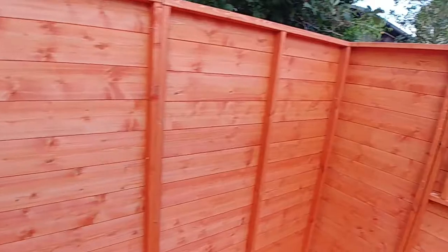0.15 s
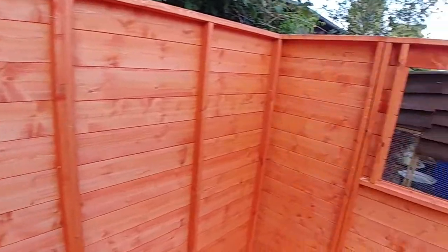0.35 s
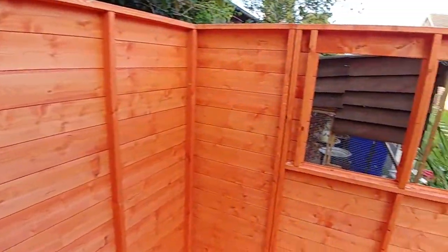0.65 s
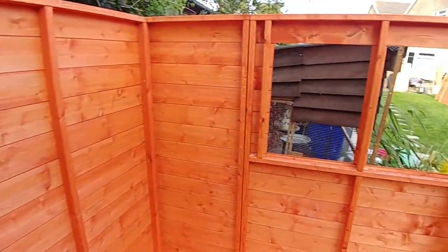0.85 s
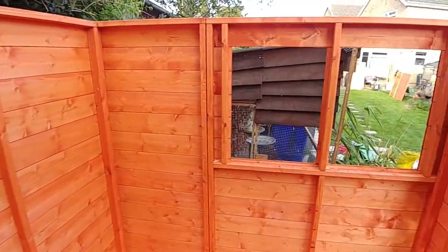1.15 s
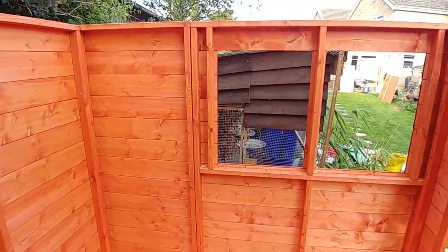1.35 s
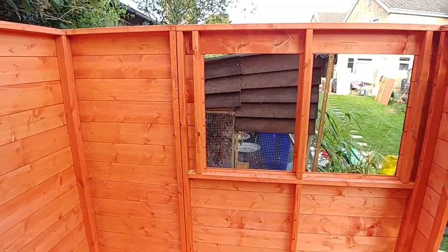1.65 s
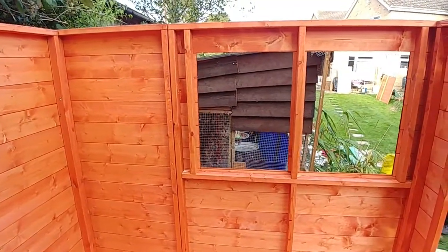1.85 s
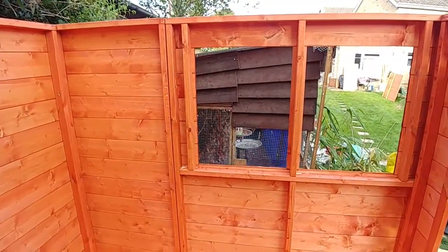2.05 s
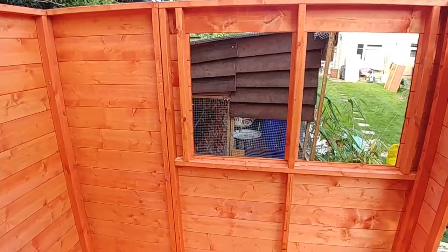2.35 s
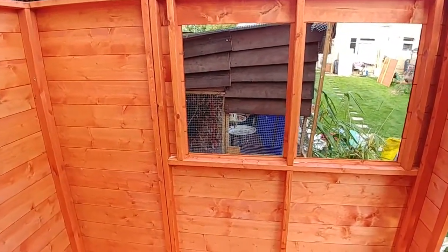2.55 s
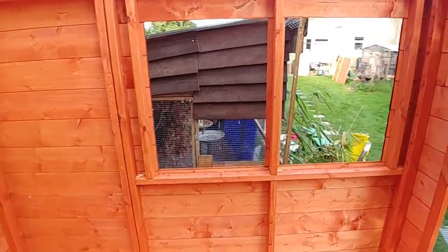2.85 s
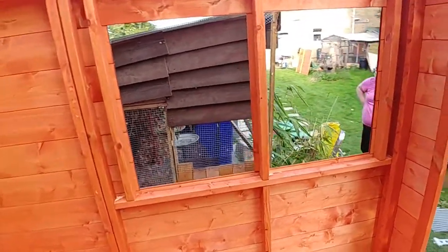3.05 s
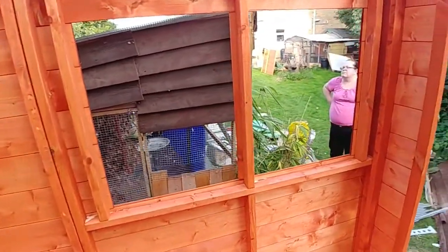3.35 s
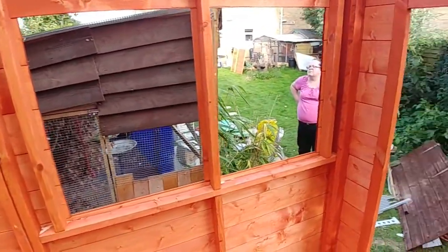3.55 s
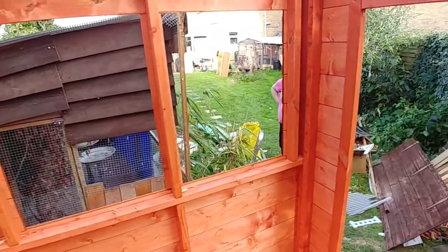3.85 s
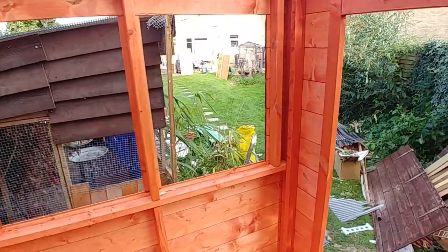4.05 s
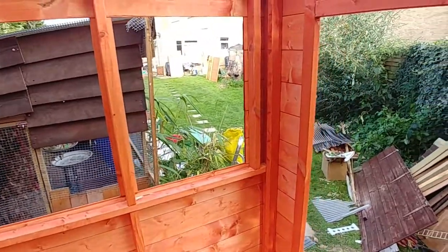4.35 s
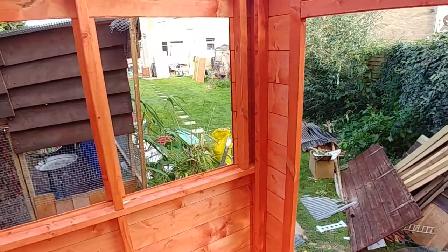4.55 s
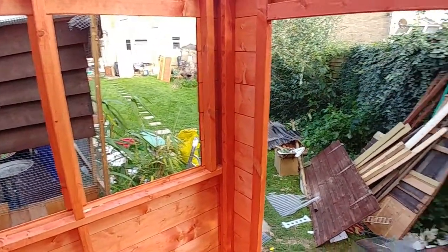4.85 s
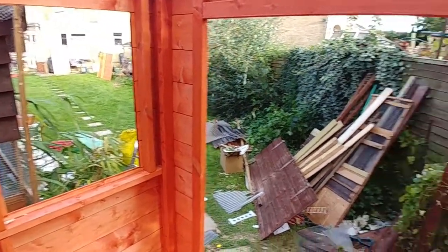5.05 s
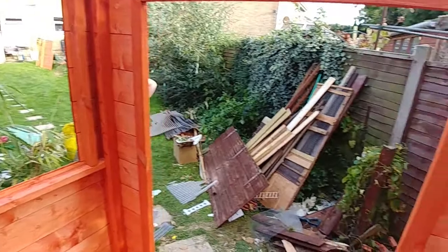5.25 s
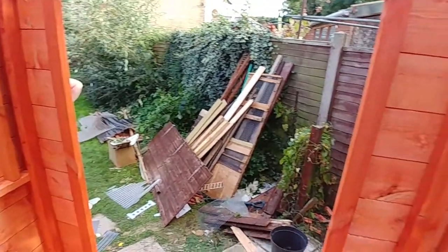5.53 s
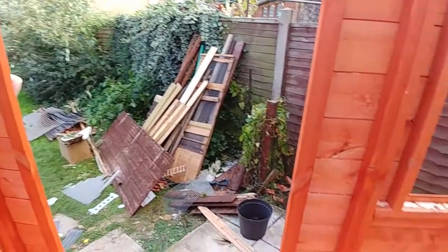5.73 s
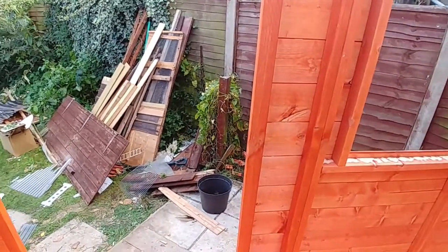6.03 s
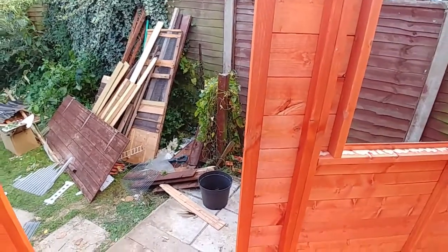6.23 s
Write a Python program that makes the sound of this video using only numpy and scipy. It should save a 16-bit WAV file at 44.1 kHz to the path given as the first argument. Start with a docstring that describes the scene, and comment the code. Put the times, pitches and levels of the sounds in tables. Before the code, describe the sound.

A handheld camera inside a roofless wooden shed hears small aviary birds in the garden over a steady low rumble and faint hiss. From 0 to 0.5 s come a harsh rasp, a clear-to-hoarse cheep, dull finger bumps and hand rubs. At 0.6-1.2 s soles scuff lightly amid scolding rasps and nasal falling warbles; the strongest rasps follow at 1.3 and 1.5 s, with a cheep. Around 2-2.7 s a longer warble, thin whistles and soft hoarse chirps are heard. A loud, deep hollow thud lands at 2.9 s, another at 3.0. Cheeps recur at 3.3, 3.65 and 4.4 s. Boards bump and scuff at 3.85 s, then boom again at 4.5-4.6 s. A bright cheep at 5.25 s overlaps a longer scuff, then a whistle and a thud at 5.5 s. Another cheep at 5.95 s and final rasps near 6.2-6.4 s end with a faint step. Wooden walls add short, quick echoes.

```python
"""A rasp, a finger bump and a hand rubbing the camera come first; then small aviary birds cheep, rasp
and warble in a garden. The place is a roofless wooden shed, where shoes thud and scuff on hollow boards.
Bird notes are fluttering gliding tones with echoes off the walls; warbles are drifting harmonics.
Steps are low pushes with ringing modes, rubs clumped noise, bumps damped pushes with ticks.
Filtered noise makes the low rumble and faint hiss outside."""
import sys
import numpy as np
from scipy import signal
from scipy.fft import rfft, irfft, next_fast_len
from scipy.io import wavfile
from scipy.ndimage import map_coordinates

SR = 44100
rng = np.random.default_rng(int(sys.argv[2]) if len(sys.argv) > 2 else 0)


def transcribe(u):
    """Save the signal u as a 16-bit wav file named by the first command-line argument.

    u: samples, shape (n,) or (channels, n), limited to [-1, 1]; the rate is SR.
    q: integer samples, one column per channel.
    """
    v = np.clip(np.atleast_2d(u).T, -1, 1)
    q = np.round(v * 32767).astype(np.int16)
    wavfile.write(sys.argv[1], SR, q)


N = 281799  # length in samples

# All levels are relative: gains farther down the chain still act on them. Pan is left over right.
# Garden rumble spectrum: freq_hz, density_db (per Hz)
RUMBLE_SPECTRUM = [(20, -32.5), (30, -21), (42, 2), (60, 1.5), (130, -2.5), (170, -4.5), (200, 1),
                   (240, -7), (330, -11.5), (500, -18.5), (1000, -20.5), (2000, -68), (5000, -62)]
# Garden hiss spectrum: freq_hz, density_db (per Hz)
HISS_SPECTRUM = [(200, -15.5), (700, 3.5), (2000, 2.5), (3100, 1), (6000, -5), (8000, -10.5),
                 (10500, -20.5), (15500, -13)]
# Likeness of left and right in sound from all around: freq_hz, correlation (-1 to 1)
STEREO_LIKENESS = [(60, 0.92), (200, 0.93), (500, 0.67), (1000, 0.045), (10000, 0.12)]
# Decay of the shed's tail: freq_hz, t60_s
SHED_DECAY = [(100, 0.6), (500, 0.44), (1500, 0.16), (3000, 0.3), (6000, 0.29), (12000, 0.095)]

# Fingers on the camera: start_s, level_db, dullness_s (softening time constant), pan_db
FINGER_BUMPS = [(0.068, -30.5, 0.00055, -20.5), (0.402, -25, 0.00018, -15.5)]
# Rubs: first a hand on the camera (rows before 0.5 s), then soles sliding on the boards:
# start_s, length_s, level_db, tilt_db (per octave), pan_db
RUB_GESTURES = [(0.094, 0.11, -35, -6.5, -4.5), (.21, 0.14, -47.5, -6.5, 5.5),
                (0.402, 0.071, -42, -6, -5.5), (0.634, 0.081, -31.5, -3, 5), (0.641, 0.06, -40.5, 13, 3),
                (0.806, 0.11, -40.5, -4.5, 2.5), (0.875, 0.066, -38, -.5, 6), (1.099, 0.063, -38, -3.5, 3),
                (3.028, 0.011, -54, 3.5, 6), (3.844, 0.025, -29.5, -12, 5.5), (4.518, 0.051, -30, 1.5, 0),
                (5.275, 0.27, -38, -0.36, 5), (5.774, 0.047, -49.5, -2, 4), (5.898, 0.055, -44, -2.5, 3.5),
                (6.353, 0.036, -43.5, -3, 3)]
# Shared noise colour of the rubs: freq_hz, density_db (per Hz)
RUB_SPECTRUM = [(40, -6.5), (110, 4), (300, -4), (600, -5), (1400, -3), (2800, 0.5), (4500, -5.5),
                (6500, -9), (8200, -11), (10500, -46), (15000, -34)]
# Resonances that colour every rub, from the boards under a sole: centre_hz, width_hz, lift_db
RUB_RESONANCES = [(450, 62, 2.5), (855, 140, 2), (1410, 320, 2.5), (2030, 260, 1), (2546, 570, -0.5)]
# Heels and soles on the floor: start_s, level_db, boom_hz, swell_s (stretched in steps), knock_db
FOOTSTEPS = [(1.098, -26.5, 129.4, 0.01, -11.5), (1.158, -36, 116, 0.01, -26),
             (2.877, -9.5, 122, 0.0094, -28), (2.995, -14, 141.4, 0.013, -17.5),
             (3.092, -30, 90.4, 0.015, -20.5), (3.848, -24.5, 165, 0.0037, -17.5),
             (3.907, -31.5, 151, 0.0095, -20), (4.522, -17.5, 132, 0.0043, -16.5),
             (4.574, -13.5, 114.5, 0.0063, -21), (4.621, -31, 128, 0.0052, -17),
             (5.52, -19, 105, 0.0072, -25.5), (6.361, -34, 102, 0.0073, -12.5)]
# Ringing modes of the board floor: freq_hz, level_db (varies by step), t60_s
FLOOR_MODES = [(57.36, -10.5, 0.89), (70.15, 3.5, 0.39), (86.4, 11, 0.102), (116.6, -27, 0.27),
               (133.3, 1, 0.36), (158.9, -30, 0.19), (193.4, 4.5, 0.17), (232.2, -15, 0.34),
               (292, -5.5, 0.25), (367.6, -19.5, 0.12)]
# Knock of the sole: freq_hz, density_db (per Hz)
KNOCK_SPECTRUM = [(50, -7.5), (150, 6.5), (280, 8.5), (400, -1.5), (600, -12.5), (1100, -16.5),
                  (2000, -38.5), (5000, -50.5), (12000, -69)]

# Bird sound as it carries to the shed: freq_hz, gain_db
BIRD_CARRY = [(1000, -35.5), (2000, -5), (2500, -0.5), (2950, 2), (6200, -9), (7100, -13), (8200, -6),
              (9200, -19), (10500, -25.5), (15000, -11.5)]
# The birds' place at the two microphone ports: freq_hz, pan_db
BIRD_SHADE = [(2500, 1), (4000, 1), (5500, -9), (7000, 0.5), (8300, 14), (10000, -3)]
# Nasal falling warbles: start_s, length_s, start_pitch_hz, level_db
WARBLE_NOTES = [(0.792, 0.098, 900, -44), (0.984, 0.106, 872, -37), (1.103, 0.082, 880, -43.5),
                (2.055, 0.2, 859.4, -40.5), (2.388, 0.079, 925, -53.5), (3.155, 0.19, 771, -51),
                (3.423, 0.19, 844, -47), (3.797, 0.12, 889, -48), (3.99, 0.09, 897, -49.5),
                (4.326, 0.13, 884, -53.5), (4.661, .18, 890, -69), (5.798, 0.11, 863, -45.5)]
# Beak colouring a warble's harmonics: freq_hz, gain_db
BEAK_RESPONSE = [(1500, -16), (2500, -5), (3300, 9), (4200, 7), (5000, 13), (6000, -4.5), (7000, -70),
                 (8000, -15), (10000, -84)]
# Harsh scolding rasps: start_s, length_s (before lead and fade), start_pitch_hz, level_db,
# scoop (share of pitch missing at the onset, 0-1), pan_db
RASP_NOTES = [(0.008, .093, 6224, -32, .06, 0), (0.286, 0.048, 4820, -39.5, .1, 1),
              (0.778, .095, 5856, -31, 0.01, 1), (0.924, 0.0744, 4956, -28.5, 0.02, -1),
              (0.998, 0.052, 6440, -31.5, 0, -4.5), (1.109, .06, 4810, -35.5, 0.02, -1.5),
              (1.321, 0.0635, 5934, -24.5, .2, -1), (1.477, .078, 6200, -24, .2, -1.5),
              (3.657, 0.066, 5650, -31, 0.05, 0), (3.807, .075, 4313, -38.5, 0.01, 3.5),
              (4.162, .11, 5010, -45, 0, 1.5), (5.525, 0.11, 5140, -33.5, 0.01, 1.5),
              (6.21, .075, 3760, -35.5, .08, -4), (6.212, 0.0606, 5730, -32.5, .05, 5),
              (6.359, .045, 3700, -39.5, 0.1, 0)]
# Soft hoarse chirps: start_s, length_s (before lead and fade), start_pitch_hz, level_db, pan_db
CHIRP_NOTES = [(2.307, 0.076, 3320, -40, 1.5), (2.387, 0.055, 3156, -46, -1),
               (2.523, .065, 3400, -39.5, -1.5), (2.685, 0.091, 3116, -50.5, 2),
               (4.002, .125, 3168, -46.5, 1), (4.165, .145, 3533, -36.5, 3), (5.062, 0.094, 3260, -66, 0)]
# Thin gliding whistles: start_s, length_s (before lead and fade), start_hz, end_hz, level_db, pan_db
WHISTLE_NOTES = [(0.357, 0.077, 6450, 6670, -50.5, -1), (1.678, 0.052, 4460, 4830, -43.5, 2.5),
                 (1.91, 0.069, 4810, 4000, -44, 2), (1.964, 0.093, 3874, 2620, -43, -0.5),
                 (1.978, 0.08, 6750, 6100, -44.5, -1.5), (2.664, .04, 6140, 6530, -53.5, 0.5),
                 (2.839, 0.043, 4425, 4216, -45, -2.5), (3.141, .11, 3000, 2540, -56, 3.5),
                 (4.528, 0.044, 6400, 6300, -46.5, -15), (4.688, 0.048, 5050, 4900, -52.5, -5.5),
                 (4.824, .045, 5110, 4790, -59.5, -7), (5.425, .062, 4396, 4760, -31, -5),
                 (5.651, 0.084, 4930, 3594, -38, -1.5), (5.73, 0.086, 6650, 6140, -46, -2)]
# Cheeps, a clear whistle breaking into a lower hoarse note: start_s, break_s (after start),
# hoarse_hz, whistle_db, hoarse_db, whistle_flutter_hz, pan_db
CHEEP_NOTES = [(0.108, .042, 3314, -35, -33.5, 110.5, -0.5), (1.54, 0.032, 3260, -32, -33, 85.4, -1.5),
               (3.298, .051, 3675, -35.5, -34.5, 191, 0), (3.65, 0.043, 3335, -33, -32, 79.3, -2),
               (4.405, .038, 3387, -33, -32, 69.3, 2), (5.243, .032, 3264, -28.5, -28, 75.2, -0.5),
               (5.949, 0.041, 3315, -31, -34, 63, -1.5)]
# Overtone level, lower in high notes: pitch_hz, octave_db
OVERTONE = [(3000, -15.5), (3800, -13), (4500, -27), (5200, -28), (6000, -46)]

# opening whistle of a cheep: pitch, end over start, length before lead and fade, overtone
CHEEP_HZ, CHEEP_FALL, CHEEP_S, CHEEP_OCTAVE_DB = 4309, 0.94, 0.0618, -10.5
BREAK_FALL, BREAK_S = 0.9, 0.088  # fall of hoarse notes and chirps; hoarse length before lead and fade
WHISTLE_FLUTTER_HZ, CHIRP_FLUTTER_HZ, RASP_FLUTTER_HZ = 55.3, 259.5, 823  # scale of the flutter
GLIDE_FLUTTER = 0.1  # a whistle's extra flutter per Hz of glide
LEAD_S = 0.009  # a voice starts this long before its note and ends this long after
RASP_FALL = 0.96  # end pitch over start pitch
SCOOP_S = 0.013  # time constant for reaching full pitch and roughness
SHEATH = 1.43  # strength of the hoarse sheath round a cheep or chirp
WARBLE_SAG, WARBLE_SAG_PER_S = 0.05, 0.55  # share of pitch lost: fixed, and per second of warble
WARBLE_DRIFT, WARBLE_JITTER = 0.008, 0.032  # slow and fast unsteadiness, as shares of the pitch
WARBLE_PAN_DB = -2  # all warbles come from one perch
FLOCK_DB, FLOCK_SPREAD_DB = -71.5, 10.5  # faintest flock note, and the range above it
TOP_HZ = 15800  # upper band limit of the camera


def amp(db):
    """Decibels to gain."""
    return 10 ** (np.asarray(db) / 20)


def unit(x):
    """Scaled to rms 1."""
    return x / np.sqrt(np.mean(x ** 2) + 1e-20)


def along(points, hz):
    """Values between (Hz, value) points on a log frequency axis."""
    f, v = np.transpose(points)
    return np.interp(np.log(hz + 1), np.log(f + 1), v)


def wobble(rate, n):
    """A smooth random curve of n samples, with rate knots a second."""
    knots = rng.standard_normal(int(n * rate / SR) + 4)
    return map_coordinates(knots, [np.arange(n) * rate / SR])


def filtered(x, response):
    """x shaped by a gain that depends on frequency."""
    n = x.shape[-1]
    m = next_fast_len(n + 4096, True)
    return irfft(rfft(x, m) * response(np.fft.rfftfreq(m, 1 / SR)), m)[..., :n]


def add(track, s, sound):
    """Mixes a sound in at time s."""
    part = track[..., max(round(s * SR), 0):][..., :sound.shape[-1]]
    part += sound[..., :part.shape[-1]]


def sides(pan_db):
    """Left and right gains."""
    return amp([[pan_db / 2], [-pan_db / 2]])


def arch(length, skew, fullness):
    """Progress 0-1 through a gesture, and its rise and fall."""
    u = np.linspace(0, 1, max(int(length * SR), 64))
    return u, np.abs(np.sin(np.pi * u ** skew)) ** fullness


def diffuse(n):
    """Stereo noise from all around: alike in the bass, nearly unrelated in the treble."""
    m = next_fast_len(n, True)
    alike = np.clip(along(STEREO_LIKENESS, np.fft.rfftfreq(m, 1 / SR)), -1, 1)
    shares = np.sqrt([(1 + alike) / 2, (1 - alike) / 2])
    mid, side = irfft(rfft(rng.standard_normal((2, m))) * shares, m)[:, :n]
    return np.array([mid + side, mid - side])


def in_shed(x, pan_db, wet_db, walls_db):
    """Direct sound, a quick flurry from the near walls and a short tail."""
    n = SR // 4
    noise = diffuse(n)
    hz, t, z = signal.stft(noise, SR, nperseg=256)
    decay = amp(-60 * t / along(SHED_DECAY, hz)[:, None])
    tail = signal.istft(z * decay, SR, nperseg=256)[1][:, :n]
    walls = noise[:, ::-1] * amp(-60 * np.arange(n) / SR / 0.064)  # t60 0.064 s
    echo = (amp(wet_db) * unit(tail) + amp(walls_db) * unit(walls)) / np.sqrt(n)
    # the farther port hears the direct sound later
    late = (np.clip([-pan_db, pan_db], 0, 6) * SR / 15000).astype(int)
    echo[[0, 1], late] += 1
    return signal.fftconvolve(x[None], echo, axes=1) / np.sqrt(1 + amp(2 * wet_db) + amp(2 * walls_db))


def garden():
    """A low, slowly wavering outdoor rumble under a faint, even hiss, both shaped from noise."""
    rumble = unit(filtered(diffuse(N), lambda hz: amp(along(RUMBLE_SPECTRUM, hz))))
    hiss = unit(filtered(diffuse(N), lambda hz: amp(along(HISS_SPECTRUM, hz))))
    waver = amp(0.8 * wobble(2, N) + 0.8 * wobble(9, N))
    return amp(-54.0) * rumble * waver * sides(4.1) + amp(-63.0) * hiss * sides(1.7)


def bumps():
    """A finger gives the camera body one push, which springs back; a soft fingertip sounds duller."""
    out, t = np.zeros((2, N)), np.arange(SR // 10) / SR
    for s, db, dull_s, pan_db in FINGER_BUMPS:
        push = np.exp(-t / 0.002) * np.cos(2 * np.pi * 170 * t)
        tick = rng.standard_normal(len(t)) * np.exp(-t / 0.0047)
        keep = np.exp(-1 / (SR * dull_s))
        soft = [1 - keep], [1, -keep]  # one-pole lowpass, used twice
        bump = signal.lfilter(*soft, signal.lfilter(*soft, push + 1.57 * tick))
        add(out, s, amp(db) * sides(pan_db) * bump / np.abs(bump).max())
    return out


def resonance_db(hz):
    """Lift from the resonances that colour every rub."""
    return sum(db / (1 + (2 * (hz - centre) / width) ** 2) for centre, width, db in RUB_RESONANCES)


def rubs():
    """A hand on the camera, then sliding soles, catch and slip as clumped noise; long rubs run smoother."""
    out = np.zeros((2, N))
    for s, length, db, tilt_db, pan_db in RUB_GESTURES:
        u, swell = arch(length, skew=0.9, fullness=0.95)
        clumps_db = 4.5 * wobble(900, len(u)) + 1.5 * wobble(110, len(u))
        slips = rng.standard_normal(len(u)) * amp(clumps_db / (1 + length / 0.15))

        def colour(hz):
            tilt = tilt_db * np.log2(hz / 1000 + 0.29)
            return amp(along(RUB_SPECTRUM, hz) + resonance_db(hz) + tilt)

        rub = unit(filtered(slips, colour)) * swell
        add(out, s, amp(db) * sides(pan_db) * in_shed(rub, pan_db, wet_db=-2.0, walls_db=5.0))
    return out


def floor_ring(t):
    """The board floor's decaying modes, at levels and phases that vary from step to step."""
    ring = np.zeros(len(t))
    for hz, level_db, t60 in FLOOR_MODES:
        decay = amp(level_db + rng.normal(0, 2.46) - 60 * t / t60)
        ring += decay * np.sin(2 * np.pi * (hz * t + rng.random()))
    return ring * (1 - np.exp(-t / 0.015))


def steps():
    """A foot pushes the boards through a few low cycles; the floor rings on and the sole knocks."""
    out, t = np.zeros((2, N)), np.arange(SR // 2) / SR
    for s, db, boom_hz, swell_s, knock_db in FOOTSTEPS:
        u = t / (1.37 * swell_s)
        push = (u * np.exp(1 - u)) ** 2.8 * np.sin(2 * np.pi * boom_hz * t)
        # a heavy foot stays down and damps the boards
        ring_db = np.clip(-13 - 0.4 * (db + 18), -30, -9)
        ring = amp(ring_db) * floor_ring(t)
        knock = unit(filtered(diffuse(len(t)), lambda hz: amp(along(KNOCK_SPECTRUM, hz))))
        knock = knock * amp(knock_db + 7.5 - 60 * t / 0.2124) * (1 - np.exp(-t / 0.0011))
        add(out, s, amp(db - 2.5) * (push + ring + knock))
    return out * sides(5.0)


def syllable(length, start_hz, end_hz, rasp_hz, octave_db, sheath=1, scoop=0):
    """A gliding whistle; fast irregular flutter of the syrinx roughens it, more so as it goes on."""
    u, swell = arch(length, skew=1, fullness=1.2)
    onset = np.exp(-u * length / SCOOP_S)
    flutter = rasp_hz * wobble(6.5 * rasp_hz + 1, len(u)) * (0.75 + 0.4 * u) * (1 - 0.7 * onset)
    glide = start_hz + (end_hz - start_hz) * (0.5 - 0.5 * np.cos(np.pi * u))
    glide = glide * (1 - scoop * onset)
    phase = 2 * np.pi * np.cumsum(glide + flutter) / SR
    voice = np.sin(phase) + amp(octave_db) * (np.sin(2 * phase) + amp(-13) * np.sin(3 * phase))
    # cycle-to-cycle jitter wraps the note in a wide, hoarse sheath
    jitter = 1000 * wobble(5000, len(u))
    hoarse = np.sin(2 * np.pi * np.cumsum(1.15 * glide + jitter) / SR) * (0.12 + 0.3 * u)
    tremble = amp(3 * wobble(200, len(u)))
    return unit((voice + sheath * hoarse) * tremble) * swell


def note(length, db, pan_db, *voice, **colour):
    """One syllable heard inside the shed; it swells in ahead of its note and fades after it."""
    sound = syllable(length + 2 * LEAD_S, *voice, **colour)
    return amp(db) * sides(pan_db) * in_shed(sound, pan_db, wet_db=2.5, walls_db=2.5)


def flock():
    """The faint twitter of the rest of the flock: scattered syllables, mostly low in their range."""
    dry_flock = np.zeros(N)
    for when, span, pitch, glide, size in rng.random((110, 5)):
        hz = 2800 * 2 ** (1.1 * pitch ** 2)
        end_hz = hz * (0.85 + 0.22 * glide)
        twitter = syllable(0.073 + 0.078 * span, hz, end_hz, 221.8, -27.0)
        add(dry_flock, when * N / SR, amp(FLOCK_DB + FLOCK_SPREAD_DB * size) * twitter)
    return in_shed(dry_flock, pan_db=-1.5, wet_db=6.5, walls_db=2.5)[:, :N]


def warble(length, start_hz, end_hz):
    """A hoarse, falling buzz; the beak passes only its middle harmonics, each swelling on its own."""
    u, swell = arch(length, skew=0.9, fullness=0.8)
    unsteady = WARBLE_DRIFT * wobble(35, len(u)) + WARBLE_JITTER * wobble(1800, len(u))
    pitch = (start_hz + (end_hz - start_hz) * u ** 1.6) * (1 + unsteady)
    k = np.arange(2, 12)[:, None]  # harmonic numbers
    drift_db = 2.5 * np.array([wobble(35, len(u)) for _ in k])
    gains = amp(along(BEAK_RESPONSE, k * pitch) + drift_db)
    harmonics = gains * np.sin(2 * np.pi * k * np.cumsum(pitch) / SR)
    return unit(np.sum(harmonics, axis=0)) * swell


def warbles():
    """A bird farther back buzzes; its pitch sags more in a longer warble."""
    out = np.zeros((2, N))
    for s, length, hz, db in WARBLE_NOTES:
        voice = warble(length, hz, hz * (1 - WARBLE_SAG - WARBLE_SAG_PER_S * length))
        add(out, s, amp(db) * in_shed(voice, WARBLE_PAN_DB, wet_db=4.5, walls_db=-1.5))
    return out * sides(WARBLE_PAN_DB)


def chatter():
    """Single notes: rasps flutter most, chirps less, and whistles more the farther they glide."""
    out = np.zeros((2, N))
    for s, length, hz, db, scoop, pan_db in RASP_NOTES:
        rasp = note(length, db, pan_db, hz, hz * RASP_FALL, RASP_FLUTTER_HZ,
                    along(OVERTONE, hz), scoop=scoop)
        add(out, s - LEAD_S, rasp)
    for s, length, hz, db, pan_db in CHIRP_NOTES:
        chirp = note(length, db, pan_db, hz, hz * BREAK_FALL, CHIRP_FLUTTER_HZ,
                     along(OVERTONE, hz) - 3, sheath=SHEATH)
        add(out, s - LEAD_S, chirp)
    for s, length, start_hz, end_hz, db, pan_db in WHISTLE_NOTES:
        flutter_hz = WHISTLE_FLUTTER_HZ + GLIDE_FLUTTER * abs(end_hz - start_hz)
        whistle = note(length, db, pan_db, start_hz, end_hz, flutter_hz,
                       along(OVERTONE, start_hz) - 8, sheath=0.9)
        add(out, s - LEAD_S, whistle)
    return out


def cheeps():
    """Each cheep opens on a clear whistle at one set pitch, then drops into a hoarse note."""
    out = np.zeros((2, N))
    for s, break_s, hz, whistle_db, hoarse_db, flutter_hz, pan_db in CHEEP_NOTES:
        whistle = note(CHEEP_S, whistle_db, pan_db, CHEEP_HZ, CHEEP_HZ * CHEEP_FALL, flutter_hz,
                       CHEEP_OCTAVE_DB, sheath=SHEATH)
        hoarse = note(BREAK_S, hoarse_db, pan_db, hz, hz * BREAK_FALL, CHIRP_FLUTTER_HZ,
                      along(OVERTONE, hz), sheath=SHEATH)
        add(out, s - LEAD_S, whistle)
        add(out, s + break_s - LEAD_S, hoarse)
    return out


def birds():
    """Near birds over the faint flock, coloured on the way and set apart at the two ports."""
    calls = flock() + warbles() + chatter() + cheeps()
    halves = [0.5, -0.5]  # left and right shares of the pan
    return filtered(calls, lambda hz: amp(along(BIRD_CARRY, hz) + np.outer(halves, along(BIRD_SHADE, hz))))


def scene():
    """The garden behind, hands and feet close by, birds outside."""
    return garden() + bumps() + rubs() + steps() + birds()


def record(dry):
    """The camera sheds the deepest bass and keeps nothing above its band limit."""
    highpass = signal.butter(3, 42, "highpass", fs=SR, output="sos")
    thinned = signal.sosfilt(highpass, dry)
    return filtered(thinned, lambda hz: hz < TOP_HZ)


dry = scene()
out = record(dry)
transcribe(out)
```